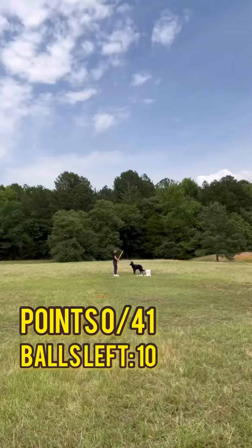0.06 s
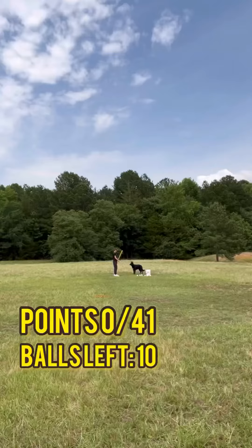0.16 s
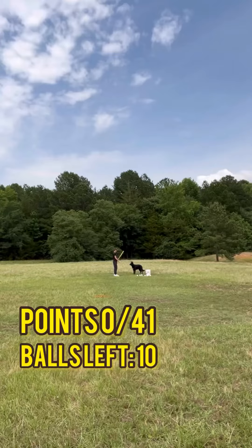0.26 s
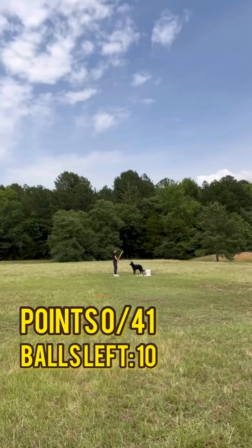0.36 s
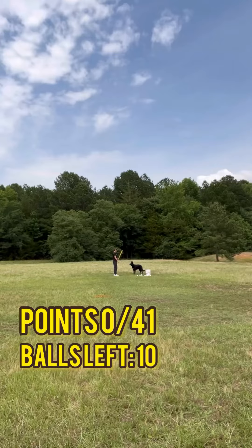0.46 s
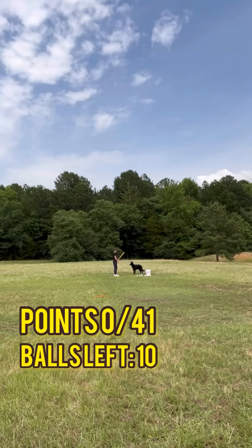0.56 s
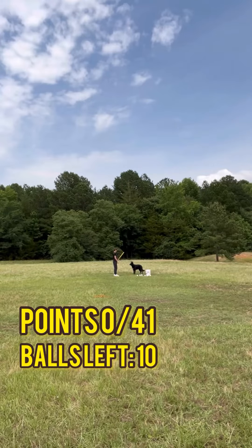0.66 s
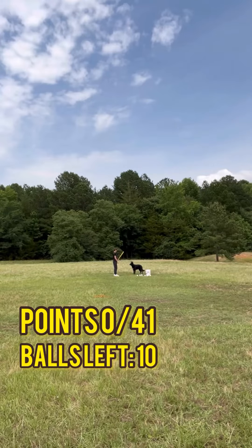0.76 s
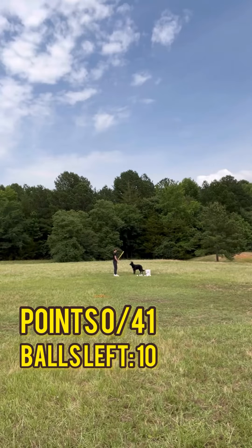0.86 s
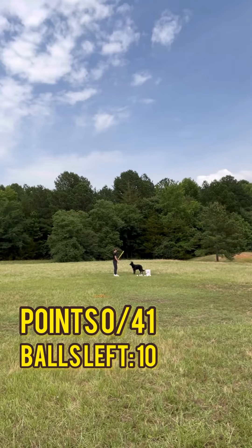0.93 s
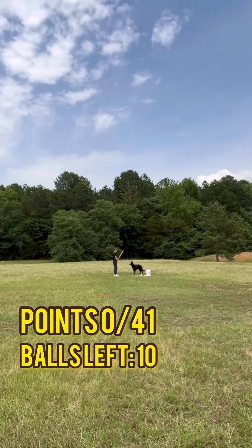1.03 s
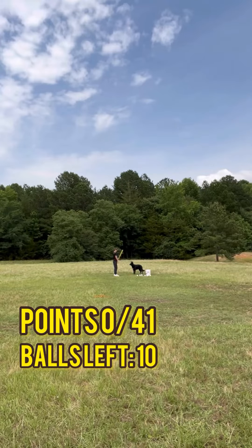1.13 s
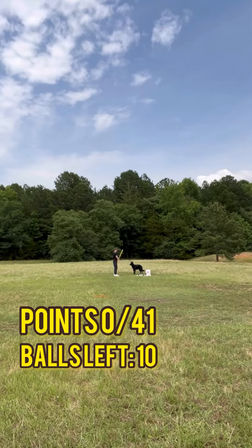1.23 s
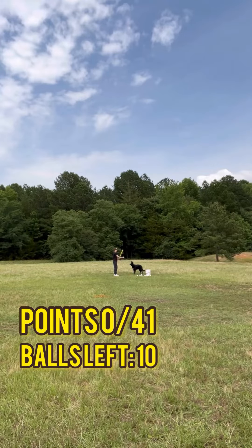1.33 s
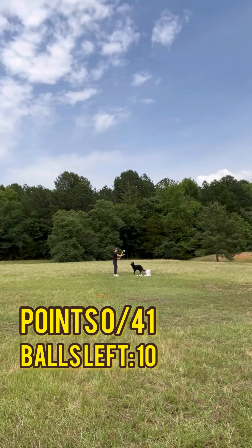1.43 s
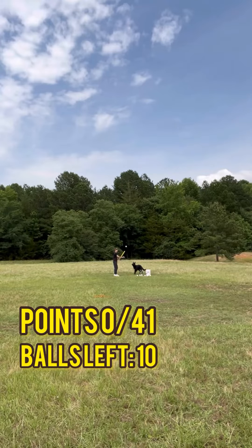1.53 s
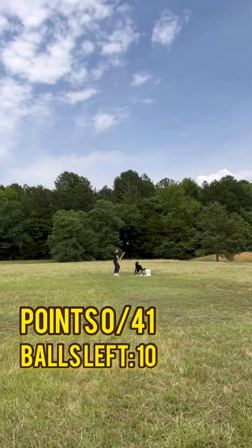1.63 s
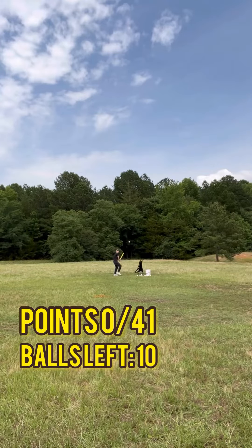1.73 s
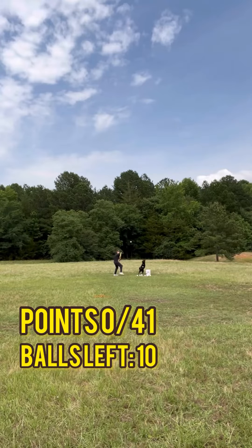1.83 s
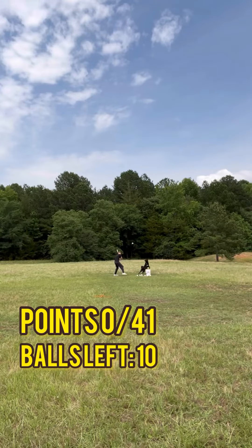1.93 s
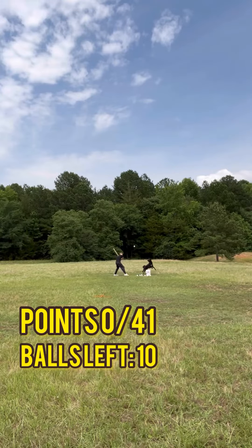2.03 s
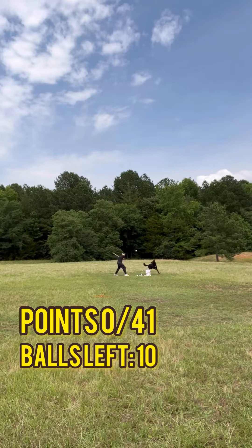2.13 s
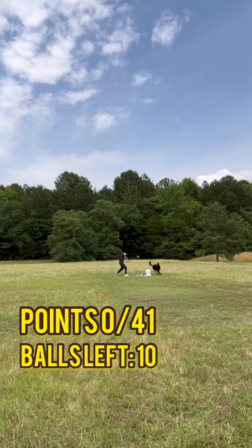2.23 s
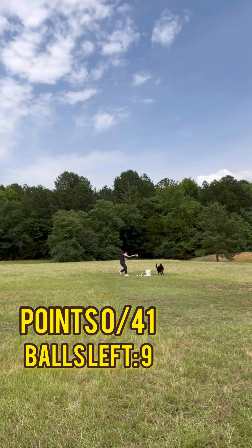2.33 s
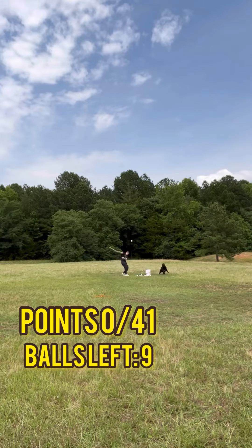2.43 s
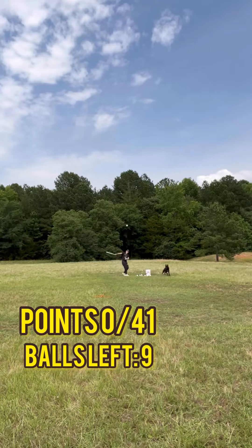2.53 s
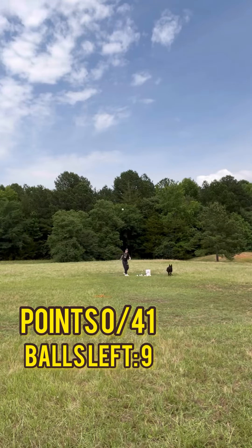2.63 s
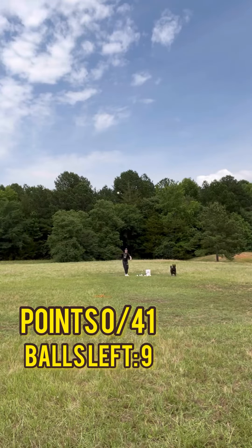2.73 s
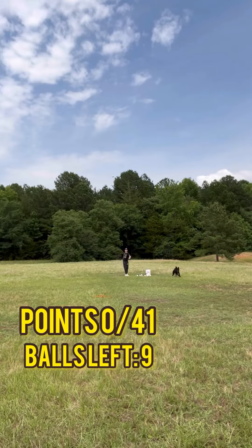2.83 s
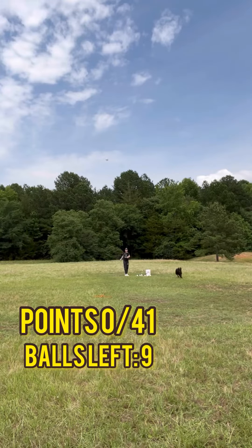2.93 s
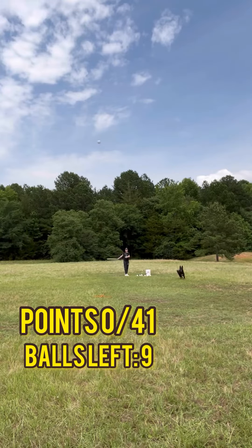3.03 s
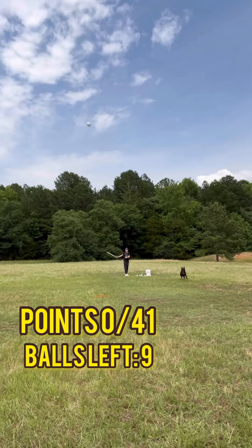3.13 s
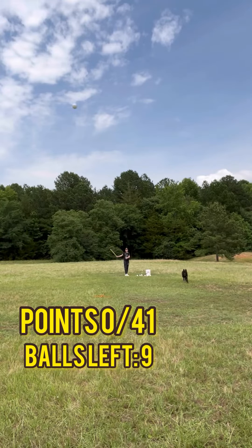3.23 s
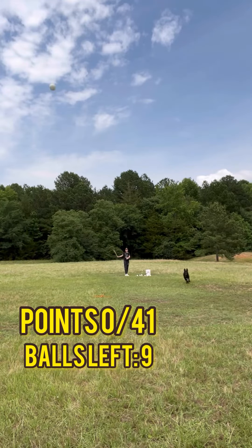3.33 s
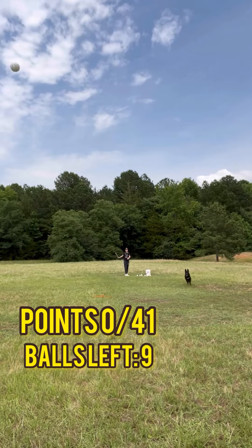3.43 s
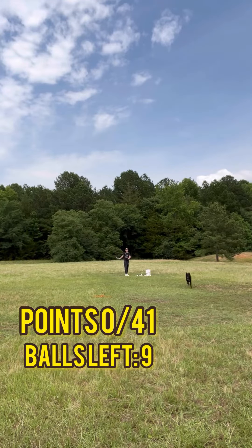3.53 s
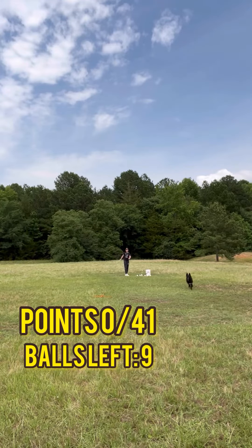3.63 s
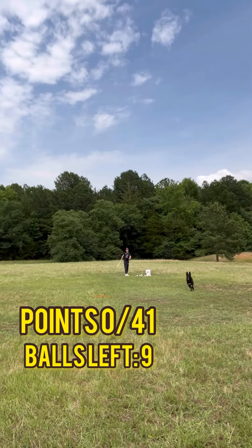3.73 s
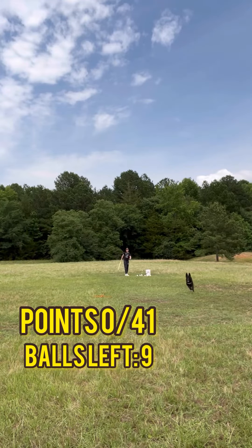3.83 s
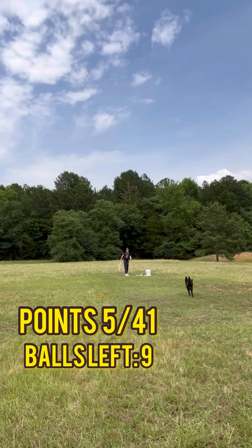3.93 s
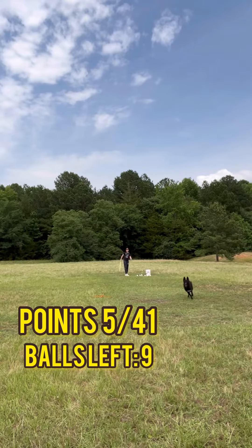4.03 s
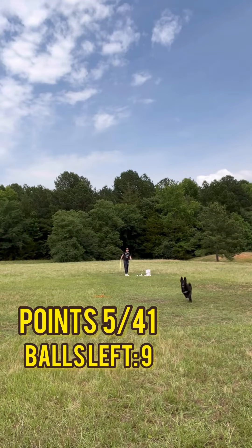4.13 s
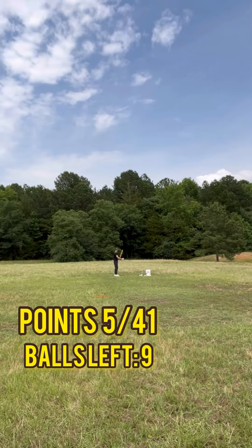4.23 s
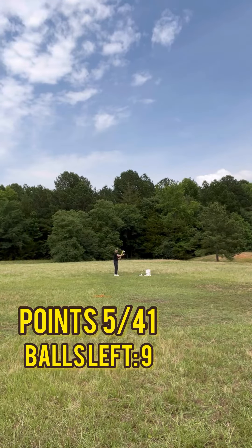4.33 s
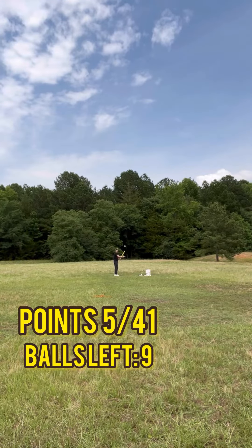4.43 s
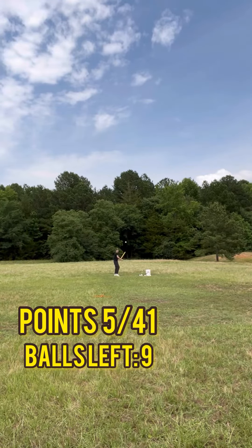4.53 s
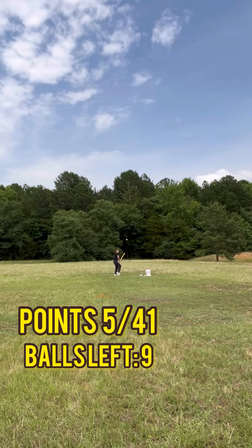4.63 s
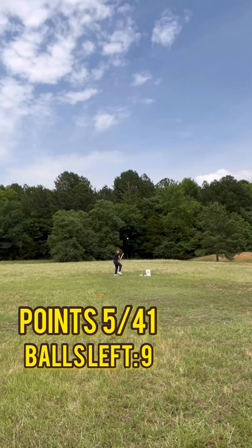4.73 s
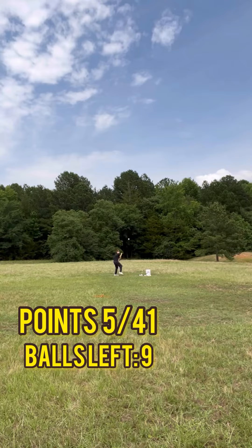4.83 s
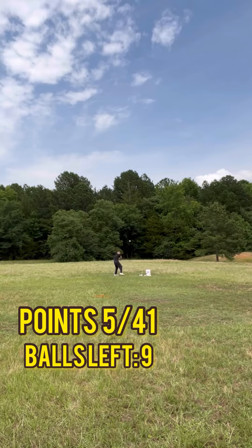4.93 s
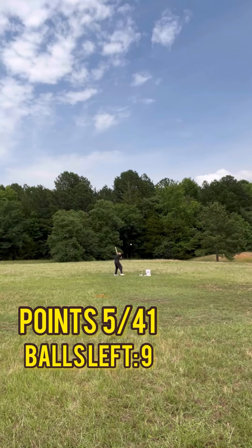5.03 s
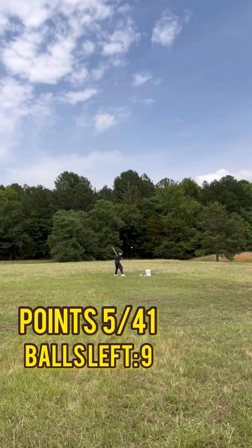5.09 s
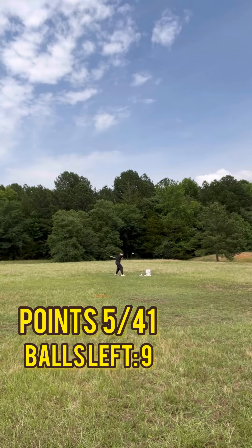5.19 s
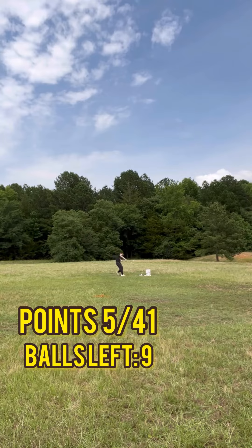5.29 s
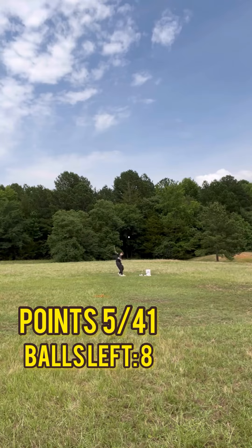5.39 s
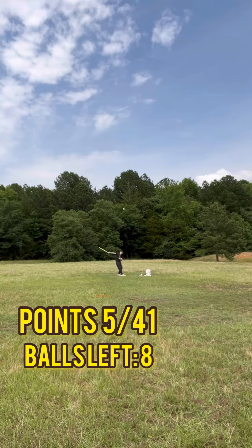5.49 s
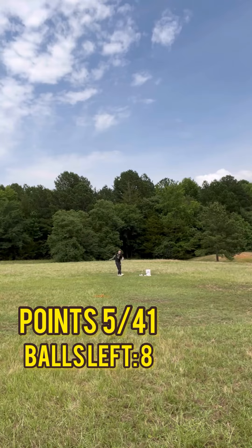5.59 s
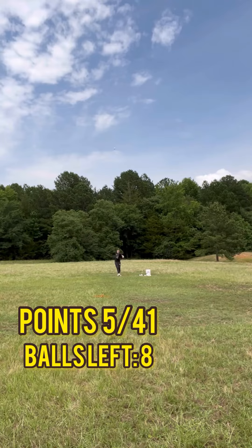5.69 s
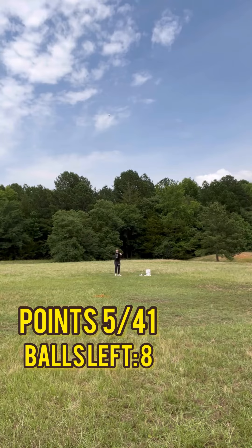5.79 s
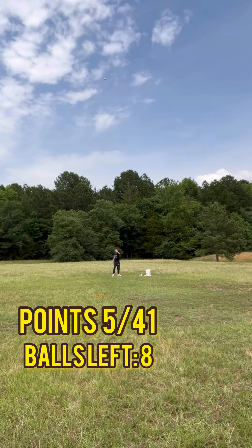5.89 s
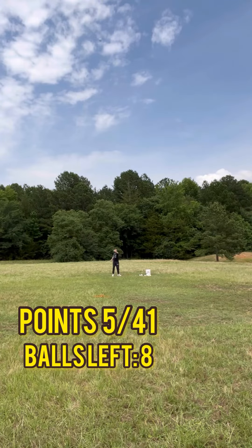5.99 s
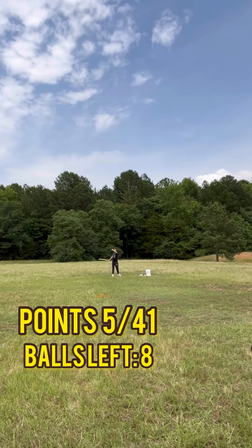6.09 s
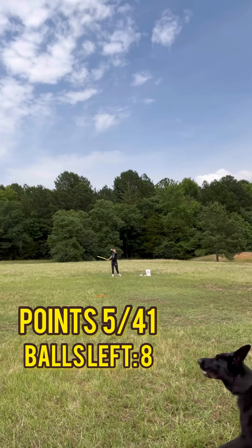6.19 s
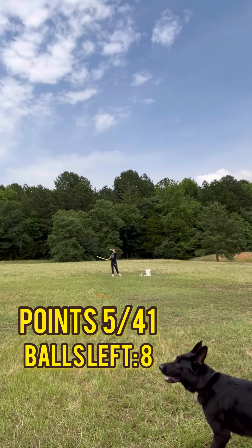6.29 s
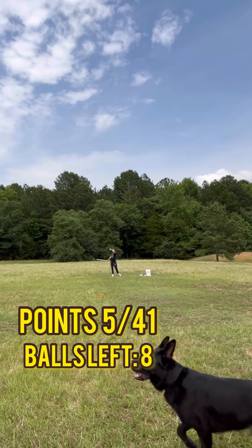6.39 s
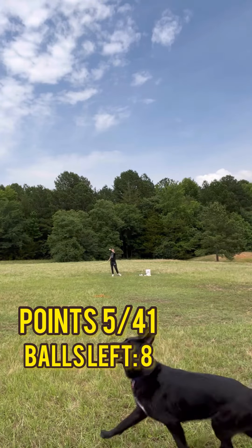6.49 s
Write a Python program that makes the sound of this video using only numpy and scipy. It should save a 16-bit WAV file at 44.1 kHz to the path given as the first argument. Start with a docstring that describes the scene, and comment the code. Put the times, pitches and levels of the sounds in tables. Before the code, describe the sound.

A distant microphone in a mown field picks up faint tree hiss, rumble, insects and thin bird whistles and twitters. A dry, hollow bat hit pops out, slightly left, answered by pattering forest echoes. A running dog's small metal tags tinkle. Close bumps, hollow taps and soft scuffs follow; a second bat crack rings out, then tags and rustling grass grow loud beside the microphone.

```python
"""Mown field by a forest edge: low rumble, insects (noise bands), tree hiss and grass rustle throughout.
Birds call from the start in gliding sines; at 2.3 s a hollow plastic bat cracks on a light ball
(noise crack, ringing shell modes) and the forest answers with blurred, scattered copies.
A dog then runs up with jingling tags (inharmonic modes); from 3.9 s hollow knocks (damped modes),
from 4.2 s thuds (low sines, puffs) and later soft scuffs sound close by; a second ball is hit at 5.4 s."""
import sys
import numpy as np
from scipy import signal
from scipy.fft import rfft, irfft, next_fast_len
from scipy.io import wavfile
from scipy.ndimage import map_coordinates

SR = 44100
rng = np.random.default_rng(int(sys.argv[2]) if len(sys.argv) > 2 else 0)


def digitize_waveform(pressure):
    """Quantize a signal to 16-bit integers and store it at the path in sys.argv[1].

    Rows of a 2-D input are taken as channels; values are limited to [-1, 1].
    """
    field = np.atleast_2d(pressure).T
    bounded = np.clip(field, -1, 1)
    quanta = np.round(bounded * 32767).astype(np.int16)
    wavfile.write(sys.argv[1], SR, quanta)


N = 288855
TIME = np.arange(N) / SR
AGE = np.arange(SR // 2) / SR  # time since an event's onset
LEFT_RIGHT = np.array([[1], [-1]])
PICKUP_CHANGE_S = 4.2  # microphone pickup changes: bass centred, insect buzz picked up a little quieter


def amp(db):
    """Decibels to gain."""
    return 10 ** (np.asarray(db) / 20)


def unit(x):
    """Scale to rms 1."""
    return x / np.sqrt(np.mean(x ** 2) + 1e-20)


def along(points, hz):
    """Interpolate (frequency, value) points on a log-frequency axis."""
    f, v = np.transpose(points)
    return np.interp(np.log(hz + 1), np.log(f + 1), v)


def over_time(points):
    """Interpolate (time, value) points at every sample."""
    return np.interp(TIME, *np.transpose(points))


def wobble(rate_hz):
    """Smooth random curve with rate_hz knots a second."""
    knots = rng.standard_normal(int(N * rate_hz / SR) + 4)
    return map_coordinates(knots, [TIME * rate_hz])


def filtered(x, response):
    """Apply a complex frequency response."""
    n = x.shape[-1]
    m = next_fast_len(n + 8192)
    spectrum = rfft(x, m) * response(np.fft.rfftfreq(m, 1 / SR))
    return irfft(spectrum, m)[..., :n]


def noise(spectrum, shape):
    """Coloured noise of rms 1; the spectrum sets only its shape."""
    return unit(filtered(rng.standard_normal(shape), lambda hz: amp(along(spectrum, hz))))


def fade(t60_s, attack_s, t=AGE):
    """Soft rise times exponential decay."""
    return np.exp(-np.log(1000) * t / t60_s) * (1 - np.exp(-(t / attack_s) ** 2))


def add(track, s, sound):
    """Mix a sound into the track from time s, cut at the track's end."""
    start = round(s * SR)
    part = track[..., start:start + sound.shape[-1]]
    part += sound[..., :part.shape[-1]]


def lean(left_over_right_db):
    """Left and right gains for a level difference."""
    return amp(LEFT_RIGHT * left_over_right_db / 2)


# two microphone ports: (frequency [Hz], left phase lead [rad])
PORT_PHASE = [(1180, 0), (2000, -1.8), (2600, -3.4), (3800, -6), (6500, -5), (8300, -3.35), (9900, -2.95),
              (11500, -1.4), (14000, 0)]


def ports(x):
    """Stereo from the phase difference that the microphone body makes between its two ports."""
    return filtered(x, lambda hz: np.exp(.5j * along(PORT_PHASE, hz) * LEFT_RIGHT))


# rumble level before sway and a 1.5 dB lift: (time [s], level [dB])
RUMBLE_LEVEL = [(0.0, -57), (.4, -51.5), (.55, -55.5), (1.3, -56), (1.62, -60.5), (2.2, -58), (2.42, -53),
                (3.6, -55.5), (3.86, -48), (4.15, -50), (4.55, -45), (4.8, -51.5), (5.05, -47.5),
                (5.3, -45.5), (5.7, -43.5), (6.55, -40.5)]
# rumble colour: (frequency [Hz], relative level [dB])
RUMBLE_SPECTRUM = [(15, -34.5), (25, -15.5), (50, -9.5), (130, 4), (188, -10), (245, -3), (315, -15.5),
                   (372, -9.5), (440, -20.5), (492, -18), (565, -24), (1000, -29.5), (1300, -37),
                   (2200, -120)]
RUMBLE_SWAY_DB = 1.5


def rumble():
    """Low outdoor rumble: coloured noise with a slowly swaying level."""
    level_db = over_time(RUMBLE_LEVEL) + 1.5 + RUMBLE_SWAY_DB * wobble(12.0)
    return amp(level_db) * noise(RUMBLE_SPECTRUM, N) * lean(1.0)


# chorus colour: (frequency [Hz], relative level [dB])
INSECT_SPECTRUM = [(1650, -27.5), (2800, -33), (3310, -4), (3750, 2.5), (4050, 4), (4400, 3.5), (4920, -8),
                   (5300, -22), (7800, -46.5), (13200, -120)]
# nearer insects, before sway and pickup change: (frequency [Hz], level [dB])
NEAR_INSECTS = [(3730, -71), (4310, -74)]
CHORUS_DB, PICKUP_LOSS_DB = -60, 1.5  # chorus before the pickup change; loss after it
SINGER_KNOTS_HZ = 130  # modulation rate, widens each tone into a buzz


def insects():
    """Chorus: wide stereo noise; nearer singers: randomly modulated tones; the pickup change quiets both."""
    buzz = amp(CHORUS_DB + 1.4 * wobble(40)) * noise(INSECT_SPECTRUM, (2, N)) * lean(0.33)
    for hz, db in NEAR_INSECTS:
        modulation = wobble(SINGER_KNOTS_HZ) + 1j * wobble(SINGER_KNOTS_HZ)
        singer = unit((modulation * np.exp(2j * np.pi * hz * TIME)).real)
        buzz = buzz + amp(db + 2.3 * wobble(2.9)) * ports(singer)
    return amp(-PICKUP_LOSS_DB * (TIME > PICKUP_CHANGE_S)) * buzz


# distant trees all around: (frequency [Hz], relative level [dB])
AIR_SPECTRUM = [(150, 8), (350, 11), (700, -1), (1500, -1), (2800, 1), (15500, -60)]
# their stereo width: (frequency [Hz], side over centre [dB])
AIR_SIDE = [(300, 2), (1000, 11), (2500, 7)]
# forest edge ahead: (frequency [Hz], relative level [dB])
LEAF_SPECTRUM = [(500, -19), (1500, -5.5), (2500, 7), (3100, 2.5), (5500, -5.5), (9000, -7), (11800, -2.5),
                 (13000, -24), (15500, -27)]


def trees():
    """Faint hiss: wide noise from distant trees, plus phase-placed noise from the forest edge."""
    centre = noise(AIR_SPECTRUM, N)
    side = filtered(noise(AIR_SPECTRUM, N), lambda hz: amp(along(AIR_SIDE, hz)))
    around = amp(-69) * np.array([centre + side, centre - side]) * lean(1.0)
    edge = amp(-75.0) * ports(noise(LEAF_SPECTRUM, N))
    return around + edge


# grass rustle, mostly under the dog, before a 5 dB lift: (time [s], level [dB])
GRASS_LEVEL = [(0.0, -81), (0.75, -79), (2.9, -70.5), (2.99, -74.5), (3.87, -68), (4.56, -77),
               (5.64, -61.5), (6.55, -62.5)]
# grass colour: (frequency [Hz], relative level [dB])
GRASS_SPECTRUM = [(200, 6.5), (500, 17), (1000, 7), (2200, 12.5), (4500, 4), (7000, 6.5), (12000, 6.5),
                  (15400, -3), (16300, -8.5)]
GRASS_SWAY_DB, GRASS_CRACKLE_DB = 1.8, 2  # slow swells; single blades snapping


def grass():
    """Countless blades brush together: noise with slow and fast level wobble, louder as the dog comes near."""
    texture_db = GRASS_SWAY_DB * wobble(12) + GRASS_CRACKLE_DB * wobble(350)
    blades = unit(noise(GRASS_SPECTRUM, N) * amp(texture_db))
    return amp(over_time(GRASS_LEVEL) + 5.0) * ports(blades)


def slide(start_hz, end_hz, length_s):
    """One exponentially gliding note that swells and stops."""
    u = np.linspace(0, 1, int(length_s * SR))
    hz = start_hz * (end_hz / start_hz) ** u
    return np.sin(np.pi * u ** 1.3) * np.sin(2 * np.pi * np.cumsum(hz) / SR)


def series(first_s, period_s, count):
    """Evenly spaced times."""
    return first_s + period_s * np.arange(count)


def phrase(syllable, rhythm, count):
    """One syllable repeated evenly, each time a little different in pitch and strength."""
    out = np.zeros(N)
    for s in series(*rhythm, count):
        pitch = 1 + .012 * rng.standard_normal()
        for delay_s, start_hz, end_hz, length_s, db in syllable:
            note = slide(pitch * start_hz, pitch * end_hz, length_s)
            add(out, s + delay_s, amp(db + rng.standard_normal()) * note)
    return out


SAG_HZ, SAG_S, SINK_HZ_PER_S = 450, .03, 750  # initial excess, its time constant; steady fall
SWELL_S, STOP_S = .06, .012


def whistle(length_s, base_hz):
    """A thin tone starts high, sags, then sinks slowly; it swells, holds its level and stops short."""
    t = TIME[:int(length_s * SR)]
    glide_hz = base_hz + SAG_HZ * np.exp(-t / SAG_S) - SINK_HZ_PER_S * t
    hz = glide_hz * (1 + 0.0015 * wobble(82.0)[:len(t)])
    envelope = np.minimum(1, t / SWELL_S) ** 2 * np.minimum(1, (t[-1] - t) / STOP_S)
    return envelope * np.sin(2 * np.pi * np.cumsum(hz) / SR)


# syllables of slides: (delay [s], start [Hz], end [Hz], length [s], relative level [dB])
SLUR_NOTES = [(0, 4580, 3130, 0.0191, -3.5), (.025, 4076, 2900, 0.017, 1), (.04, 2930, 1950, 0.042, -11.5)]
TWITTER_NOTES = [(0, 4750, 5080, 0.019, -11.5), (.052, 6380, 4870, 0.0083, -4.5)]
# tones of one call: (time [s], length [s], base frequency [Hz], level [dB])
WHISTLE_TONES = [(0.598, 0.3, 4940, -57.5), (0.629, 0.26, 6580, -73.5), (0.71, 0.21, 7450, -78)]
# lone low notes: (time [s], start [Hz], end [Hz], length [s], level [dB])
LONE_NOTES = [(0.172, 2290, 2100, 0.11, -68.5), (0.948, 2030, 2140, 0.024, -68),
              (1.15, 2360, 2140, .036, -72), (6.365, 1990, 1880, 0.021, -49)]
SLUR_RHYTHM_S, TWITTER_RHYTHM_S = (1.348, .111), (1.912, .156)  # (first, period)
SLUR_DB, TWITTER_DB = -53, -56.5
TRILL_DELAY_S, TRILL_PERIOD_S = .072, .0125
TRILL_START_HZ, TRILL_END_HZ, TRILL_DB = 3650, 2950, 1  # level relative to the twitter


def birds():
    """Whistle, slurs, twitters ending in trills, and lone notes: gliding sines, blurred by the trees."""
    trill = [(delay_s, TRILL_START_HZ, TRILL_END_HZ, TRILL_PERIOD_S, TRILL_DB)
             for delay_s in series(TRILL_DELAY_S, TRILL_PERIOD_S, count=4)]
    song = amp(SLUR_DB) * phrase(SLUR_NOTES, SLUR_RHYTHM_S, count=5)
    song += amp(TWITTER_DB) * phrase(list(TWITTER_NOTES) + trill, TWITTER_RHYTHM_S, count=3)
    for s, length_s, hz, db in WHISTLE_TONES:
        add(song, s, amp(db) * whistle(length_s, hz))
    for s, start_hz, end_hz, length_s, db in LONE_NOTES:
        add(song, s, amp(db) * slide(start_hz, end_hz, length_s))
    leaves = rng.standard_normal((2, len(AGE))) * fade(t60_s=0.18, attack_s=.005)
    leaves = leaves / np.linalg.norm(leaves[0])
    blur = signal.fftconvolve(song[None], leaves, axes=1)[:, :N]
    direct = filtered(song, lambda hz: np.exp(.7j * LEFT_RIGHT)) * lean(11.0)
    return direct + amp(-6.5) * blur


# soft scuffs close by: (time [s], length [s], level [dB])
SCUFF_STROKES = [(5.054, 0.15, -56), (5.241, 0.28, -52.5)]
# scuff colour: (frequency [Hz], relative level [dB])
SCUFF_SPECTRUM = [(100, -47), (350, 7.5), (800, 15), (1300, 5.5), (3000, -66), (8000, -62)]


def scuffs():
    """Dull brushing: noise that swells and stops."""
    out = np.zeros(N)
    for s, length_s, db in SCUFF_STROKES:
        stroke = np.sin(np.pi * np.minimum(AGE / length_s, 1))
        add(out, s, amp(db) * stroke * noise(SCUFF_SPECTRUM, len(AGE)))
    return out


# dull thuds close by: (time [s], level [dB], frequency [Hz], boom t60 [s], puff over boom gain [dB])
THUD_BLOWS = [(4.203, -11, 102.3, 0.2, -15.5), (4.274, -20, 95, 0.34, -13.5),
              (4.39, -30.5, 54.6, 0.3, -12.5), (5.14, -20.5, 103.7, 0.17, -13.5),
              (5.665, -26.5, 116, 0.32, -13.5), (6.405, -31.5, 60, 0.46, -11)]
# air pushed by a thud: (frequency [Hz], relative level [dB])
PUFF_SPECTRUM = [(20, -2), (50, 9), (130, 5.5), (300, -4.5), (600, -15.5), (1000, -29.5), (2000, -62),
                 (8000, -70)]


def thuds():
    """Low, soft blows: a decaying boom sine and a longer puff of air noise."""
    out = np.zeros(N)
    for s, db, hz, t60_s, puff_db in THUD_BLOWS:
        boom = np.sin(2 * np.pi * hz * AGE) * fade(t60_s, attack_s=0.018)
        puff = noise(PUFF_SPECTRUM, len(AGE)) * fade(1.56 * t60_s, attack_s=0.0022)
        add(out, s, amp(db) * (boom + amp(puff_db) * puff))
    return out


# hollow knocks close by: (time [s], level [dB], damping [ratio, divides t60],
#   cavity level [dB], cavity frequency [Hz], lift of modes above 1.5 kHz [dB])
KNOCK_HITS = [(3.9136, -32.5, 1.38, 7.5, 1060, -1.5), (3.9175, -36.5, 0.9, 5.5, 596, -12),
              (4.7867, -23, 0.7, -4, 830, 3), (5.9633, -31, 1.73, 12, 620, -4),
              (5.995, -34.5, 0.19, 1, 507, -8), (6.0173, -25, 0.59, 3.5, 494, 2.5),
              (6.546, -28.5, 1.63, 9, 650, -10)]
# wall modes: (frequency [Hz], relative level [dB], t60 at damping 1 [s])
WALL_MODES = [(652, -15, 0.055), (823, -8, 0.028), (1106, -13, 0.052), (2026, -5, 0.017),
              (2300, 1.5, 0.017), (3585, -5.5, 0.015), (4110, -16, 0.0072), (4470, -3, 0.0078)]
# noisy contact: (frequency [Hz], relative level [dB])
CONTACT_SPECTRUM = [(100, -4), (500, 4.5), (1400, -3.5), (4500, -4), (8000, -19), (15000, -30)]
CAVITY_T60_S, CONTACT_T60_S, CONTACT_DB = 0.014, 0.027, -4  # t60 at damping 1
THUMP_HZ, THUMP_T60_S, THUMP_DB = 243, 0.021, -16


def knocks():
    """A hollow thing is tapped: walls ring, the cavity pops over a low thump and the contact rasps."""
    out = np.zeros(N)
    hz, level_db, t60_s = np.transpose(WALL_MODES)[:, :, None]
    flip = (-1) ** np.arange(len(hz))[:, None]  # neighbouring modes start in opposite directions
    thump = amp(THUMP_DB) * np.sin(2 * np.pi * THUMP_HZ * AGE) * fade(THUMP_T60_S, 1 / THUMP_HZ)
    for s, db, damping, cavity_db, cavity_hz, bright_db in KNOCK_HITS:
        mode_hz = hz * (1 + 0.017 * rng.standard_normal(hz.shape))
        strength = flip * amp(level_db + bright_db * (hz > 1500))
        modes = strength * np.sin(2 * np.pi * mode_hz * AGE) * fade(t60_s / damping, 0.00085)
        ring = np.sum(modes, axis=0)
        cavity_fade = fade(CAVITY_T60_S / damping, 0.00074)
        cavity = amp(cavity_db) * np.sin(2 * np.pi * cavity_hz * AGE) * cavity_fade
        rasp = noise(CONTACT_SPECTRUM, len(AGE)) * fade(CONTACT_T60_S / damping, 0.0011)
        add(out, s, amp(db) * (ring + thump + amp(CONTACT_DB) * rasp - cavity))
    return ports(out)


RUN_START_S, RUN_END_S, STRIDE_HZ = 2.4, 6.5, 2.9  # the dog's gallop
STRIDE_TOUCH_DB, TOUCH_SPREAD_DB = 18, 2  # touches over GRASS_LEVEL


def stride_touches():
    """Each stride shakes the tags at three random times, following the grass level; rows as TAG_CLINKS."""
    strides = np.repeat(np.arange(RUN_START_S, RUN_END_S, 1 / STRIDE_HZ), 3)
    times = strides + rng.random(len(strides)) / STRIDE_HZ
    near_db = np.interp(times, *np.transpose(GRASS_LEVEL))
    return [(s, db + STRIDE_TOUCH_DB + TOUCH_SPREAD_DB * rng.standard_normal(), 0)
            for s, db in zip(times, near_db)]


# clinks at set times, 3.5 dB lower when played: (time [s], level [dB], lift of modes above 13 kHz [dB])
TAG_CLINKS = [(2.46, -49, -6), (2.6595, -48, -8), (2.6878, -41, -2), (2.9198, -51, 7), (3.0046, -44.5, -10),
              (3.27, -41.5, 3), (3.3957, -46, -3), (3.6935, -48, -2), (4.0432, -42.5, -4),
              (5.2869, -35, -16), (5.3183, -41, -8), (5.6525, -32, 7), (6.0043, -48, 10),
              (6.1539, -39.5, 9), (6.4418, -31.5, -8)]
# collar tag modes: (frequency [Hz], relative level [dB], t60 [s])
TAG_MODES = [(6250, -14, .06), (6780, -15, .05), (10880, -13, .06), (12080, -1, .06), (12290, -9, .13),
             (14420, -7, .045), (14640, -4, .05), (15030, -12, .1)]
TICK_SPECTRUM = [(3000, -20), (6500, 24.0), (9000, 19), (12000, 29.0), (15500, -14)]  # (Hz, dB)


def tags():
    """Small metal tags tick, ring in inharmonic modes and chatter, at set times and at random in each stride."""
    out, t = np.zeros((2, N)), AGE[:SR // 8]
    hz, level_db, t60_s = np.transpose(TAG_MODES)[:, :, None]
    for s, db, upper_db in list(TAG_CLINKS) + stride_touches():
        spread_db = 2.5 * rng.standard_normal(hz.shape)
        strength = amp(level_db + upper_db * (hz > 13000) + spread_db)
        mode_hz = hz * (1 + 0.0045 * rng.standard_normal(hz.shape))
        phase = 2 * np.pi * (mode_hz * t + rng.random(hz.shape))
        ring = np.sum(strength * np.sin(phase) * fade(t60_s, 0.0016, t), axis=0)
        tick = noise(TICK_SPECTRUM, len(t)) * fade(t60_s=0.035, attack_s=0.0002, t=t)
        touch = amp(db - 3.5) * (ring + amp(-5.0) * tick)
        add(out, s, touch)
        for delay, size in rng.random(size=(3, 2)):  # chatter within 30 ms
            add(out, s + .03 * delay, amp(-12) * size * touch)
    return ports(out)


# hollow bat and ball: (frequency [Hz], relative level [dB], t60 [s])
SHELL_MODES = [(888, -30, 0.044), (1137, -11, 0.014), (1437, 1, 0.011), (1730, -7, 0.016),
               (3430, -29, 0.013), (4180, -22, 0.019), (4620, -21.5, 0.0097)]


def shell(swell_cycles, upper_db):
    """The plastic shell's modes swell over a cycle or two and die; neighbours start in opposite directions."""
    out = np.zeros(len(AGE))
    for k, (hz, db, t60_s) in enumerate(SHELL_MODES):
        strength = (-1) ** k * amp(db + upper_db * (1600 < hz < 2500))
        out += strength * np.sin(2 * np.pi * hz * AGE) * fade(t60_s, swell_cycles / hz)
    return out


# what the trees return: (frequency [Hz], relative level [dB])
WOODS_SPECTRUM = [(300, -9.5), (900, 3.5), (1250, 4), (1700, -11), (4000, -22.5), (10000, -42.5)]


def smear(sound, envelope):
    """Countless trunks and leaves return the sound, spread in time and dulled: noise convolution."""
    paths = noise(WOODS_SPECTRUM, len(envelope)) * envelope
    return signal.fftconvolve(sound, paths / np.linalg.norm(paths))


ECHO_T60_S, ECHO_NOTE_DB, ECHO_BLUR_DB = 0.038, -3, -18.5


def echo(hz):
    """Trees return a narrow part of the shell's note as one short, blurred pock."""
    note = np.sin(2 * np.pi * hz * AGE) * fade(ECHO_T60_S, attack_s=0.0045)
    blur = smear(shell(swell_cycles=1, upper_db=0), fade(t60_s=0.07, attack_s=0.002))[:len(AGE)]
    return amp(ECHO_NOTE_DB) * note + amp(ECHO_BLUR_DB) * blur


GROUND_HZ, GROUND_WIDTH_HZ, GROUND_DEPTH = 560, 380, 0.75


def ground(x):
    """The reflection off the soft turf cancels the low mids of a far sound: a broad dip."""
    def response(hz):
        width = 1j * hz * GROUND_WIDTH_HZ
        return 1 - GROUND_DEPTH * width / (GROUND_HZ ** 2 - hz ** 2 + width)
    return filtered(x, response)


# bat on ball: (time [s], level [dB], lift of 1.6-2.5 kHz shell modes [dB], crack gain [dB],
#   rebound delay [s], rebound gain [dB], forest wash gain [dB])
BAT_HITS = [(2.3315, -3.5, 0, -11.5, 0.0030, -19, -29), (5.363, 0.5, -9, -16, 0.0028, -44, -33)]
# crack colour: (frequency [Hz], relative level [dB])
CRACK_SPECTRUM = [(300, 1), (1500, 4), (2600, 6.5), (4000, -3.5), (9000, -4.5), (16500, -17)]
# scatter off the turf: (frequency [Hz], relative level [dB])
TURF_SPECTRUM = [(35, -13), (140, 6), (300, -4), (550, -8), (1000, 0), (1800, 1), (4000, -23), (15000, -32)]
# cracks returned by single stands of trees, each with its own colour:
#   (time [s], level [dB], frequency [Hz])
TREE_ECHOES = [(2.457, -31, 1444), (2.659, -29.5, 1280), (2.739, -36, 1240), (3.675, -31.5, 1215),
               (3.697, -34.5, 1244), (3.768, -32, 1240), (5.497, -29, 1450), (5.561, -28, 1350),
               (5.625, -28, 1240), (5.690, -27.5, 1250), (5.758, -34.5, 1160), (5.805, -32.5, 1305)]
# batter a little to the left: (frequency [Hz], left over right [dB])
BAT_LEAN = [(4500, 2.6), (8000, 0)]
SHELL_LAG_S = 0.00043  # the shell answers just after first contact
WASH_RISE_S = 0.065  # the open field keeps the forest's answer back


def bat():
    """Each hit: noise crack, shell pock, rebound, turf scatter and the forest's long, pattering answer."""
    direct, woods = np.zeros(N), np.zeros(N)
    long = TIME[:2 * SR]
    for s, db, upper_db, crack_db, rebound_s, rebound_db, wash_db in BAT_HITS:
        crack = noise(CRACK_SPECTRUM, len(AGE)) * fade(t60_s=0.021, attack_s=0.00047)
        pock = amp(db + crack_db) * crack
        add(pock, SHELL_LAG_S, amp(db) * shell(1.52, upper_db))
        add(direct, s, pock)
        add(direct, s + rebound_s, amp(rebound_db) * pock)
        scatter = noise(TURF_SPECTRUM, len(AGE)) * fade(t60_s=0.11, attack_s=0.001)
        add(direct, s, amp(db - 24.5) * scatter)
        trunks = amp(4.5 * wobble(60))[:len(long)]  # patter
        near = fade(t60_s=3.4, attack_s=WASH_RISE_S, t=long)
        far = amp(-9.5) * fade(t60_s=8.1, attack_s=1.0, t=long)
        add(woods, s, amp(wash_db) * smear(pock, trunks * (near + far)))
    for s, db, hz in TREE_ECHOES:
        add(woods, s, amp(db) * echo(hz))
    return filtered(ports(ground(direct) + woods), lambda hz: lean(along(BAT_LEAN, hz)))


def scene():
    """Everything on the field, background to bat."""
    background = rumble() + insects() + trees() + grass() + birds()
    return background + scuffs() + thuds() + knocks() + tags() + bat()


LOW_CUT_HZ, TOP_HZ, NARROW_BELOW_HZ = 17, 16000, 900


def record(dry):
    """Centres the bass after the pickup change; cuts the deepest rumble and all above the band limit."""
    side = (dry[0] - dry[1]) / 2
    low_side = filtered(side, lambda hz: 1 / (1 + (hz / NARROW_BELOW_HZ) ** 8)) * (TIME > PICKUP_CHANGE_S)
    centred = dry - LEFT_RIGHT * low_side

    def band(hz):
        low_cut = hz ** 4 / (hz ** 4 + LOW_CUT_HZ ** 4)
        return low_cut / (1 + (hz / TOP_HZ) ** 120)
    return filtered(centred, band)


dry = scene()
out = record(dry)
digitize_waveform(out)
```